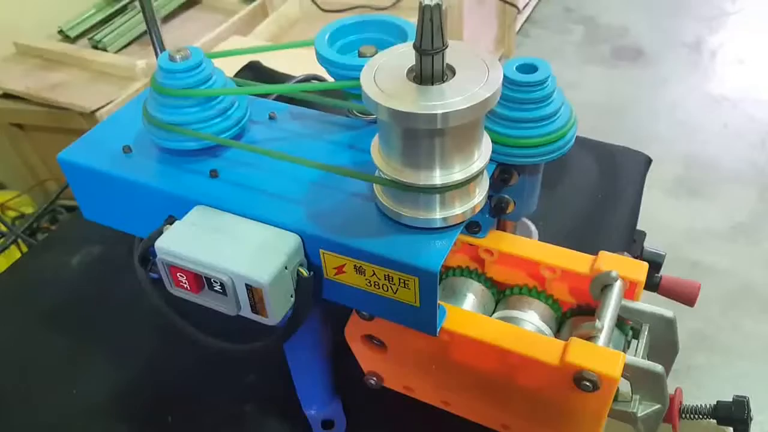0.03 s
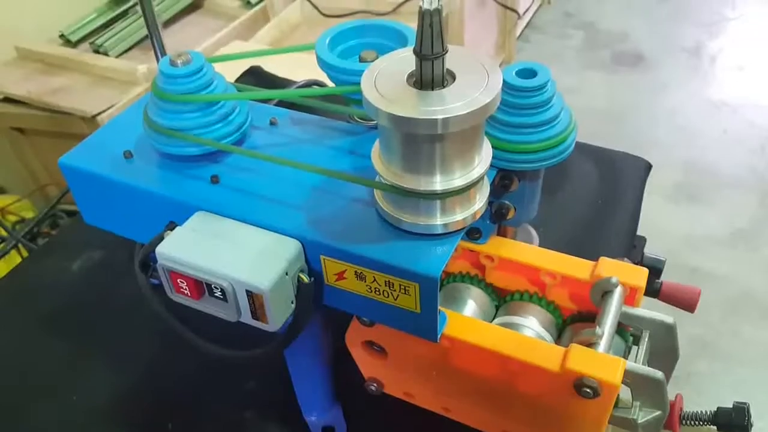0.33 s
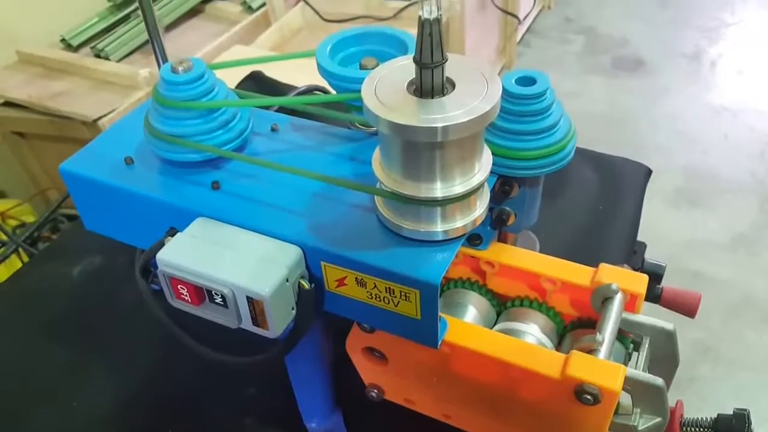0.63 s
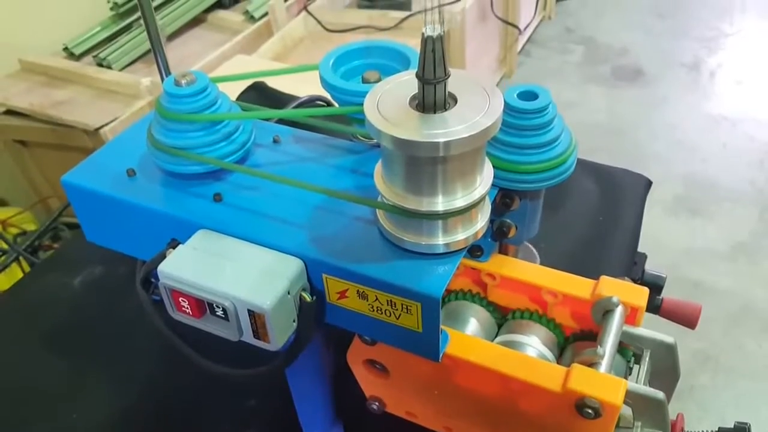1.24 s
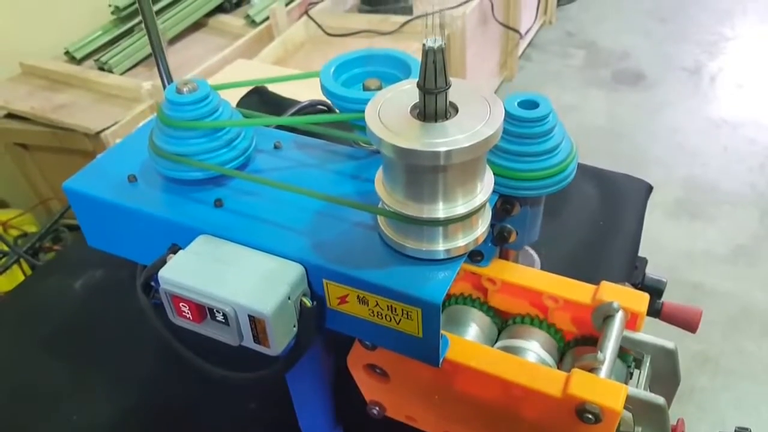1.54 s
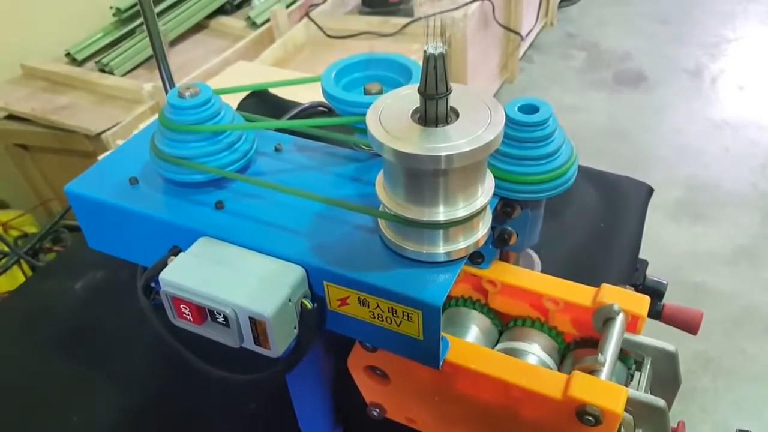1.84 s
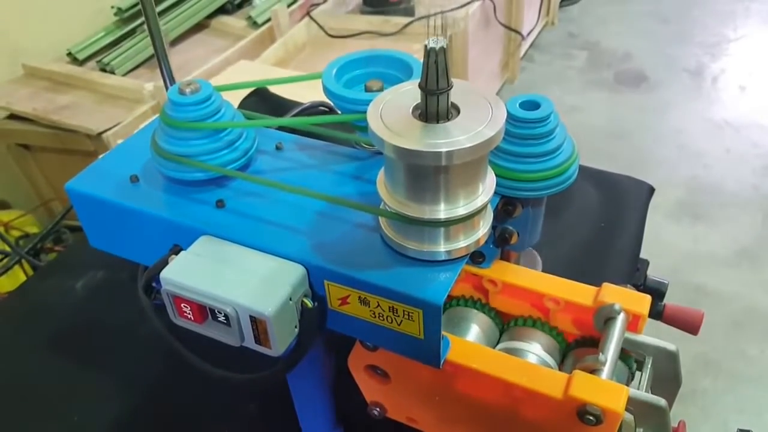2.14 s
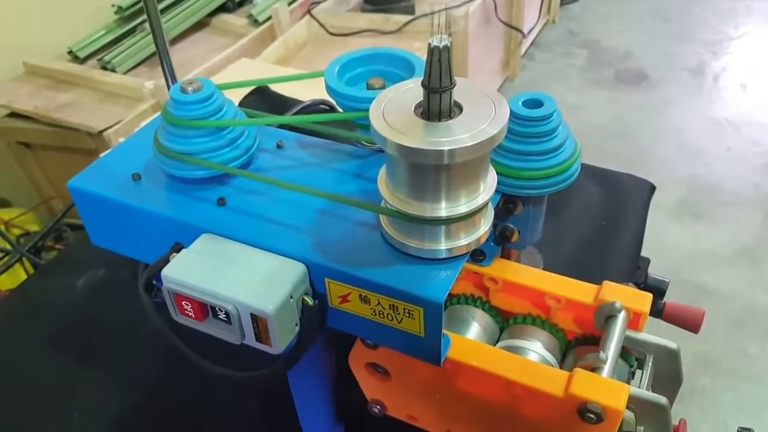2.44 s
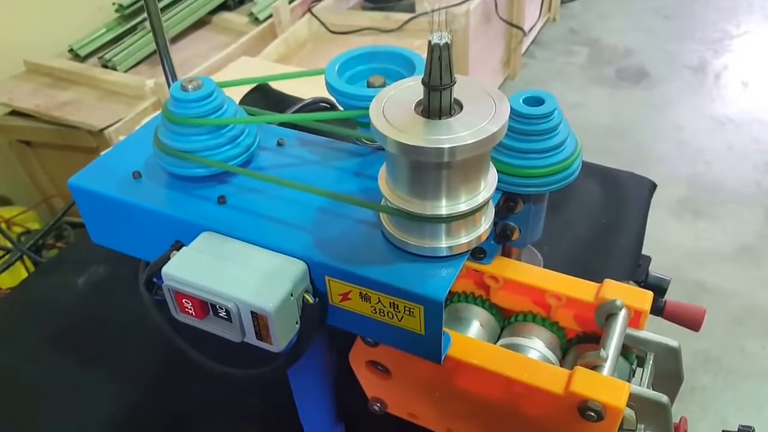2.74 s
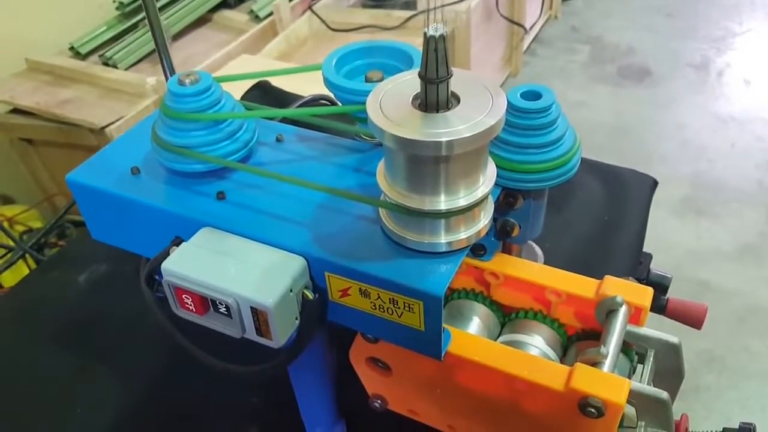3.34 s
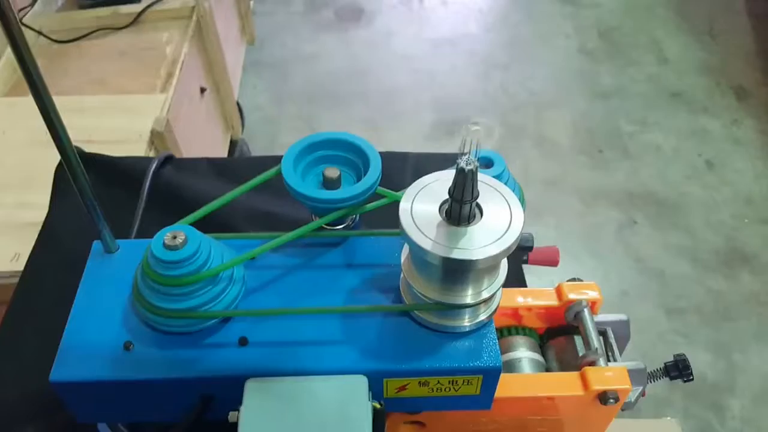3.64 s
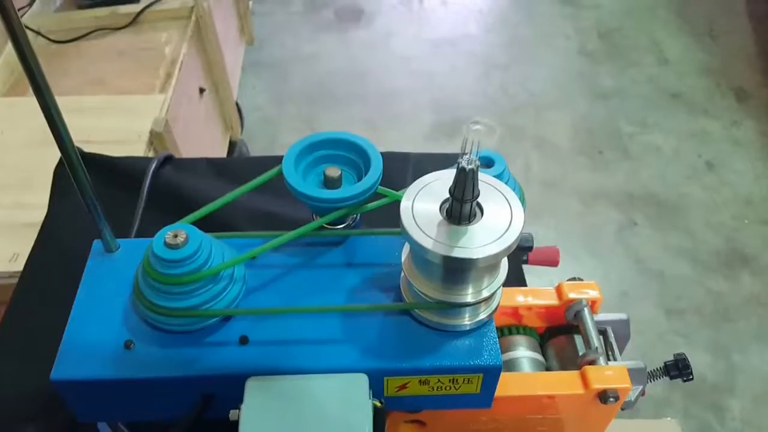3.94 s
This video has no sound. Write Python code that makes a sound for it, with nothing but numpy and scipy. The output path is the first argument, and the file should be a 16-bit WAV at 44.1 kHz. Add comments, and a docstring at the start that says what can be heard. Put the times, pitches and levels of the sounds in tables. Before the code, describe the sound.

After a brief silence, the whirr of a small belt-driven machine fades in from about 0.5 to 1 second and runs steadily, close by in a workshop. The motor hums and gears whine and rattle in a metal case, while belts flap and chafe in a quick rhythm, with occasional light scrapes and soft thumps. At about 3.7 seconds the listening position jumps and different tones stand out.

```python
"""A steady whirr fades in: a small belt-driven bench machine, running close by in a workshop.
The motor hums; its gears whine, rattle in a metal case and, with belt and shaft, shake the frame.
Two round belts flap on every lap, and the faster one also throbs and chafes on a pulley.
Near the end the listening position jumps to another side: a new colour, and other tones stand out."""
import sys
import numpy as np
from scipy import signal
from scipy.fft import rfft, irfft, next_fast_len
from scipy.io import wavfile
from scipy.ndimage import map_coordinates

SR = 44100
rng = np.random.default_rng(int(sys.argv[2]) if len(sys.argv) > 2 else 0)


def digitize_waveform(pressure):
    """Quantize a signal to 16-bit integers and store it at the path in sys.argv[1].

    Rows of a 2-D input are taken as channels; values are limited to [-1, 1].
    """
    field = np.atleast_2d(pressure).T
    bounded = np.clip(field, -1, 1)
    quanta = np.round(bounded * 32767).astype(np.int16)
    wavfile.write(sys.argv[1], SR, quanta)


N = 176400
SHAFT_HZ, MESH_HZ = 23.375, 185.05  # shaft turns and tooth contacts per second
LAP_HZ, SECOND_LAP_HZ = 9.385, 5.93  # laps per second of the two belts


def amp(db):
    """Decibels to gain."""
    return 10 ** (np.asarray(db) / 20)


def unit(x):
    """Scale to rms 1."""
    return x / np.sqrt(np.mean(x ** 2) + 1e-20)


def wobble(per_s):
    """A smooth random curve with per_s knots a second."""
    knots = rng.standard_normal(int(N * per_s / SR) + 4)
    return map_coordinates(knots, [np.arange(N) * per_s / SR])


def colour(x, rows, column=1):
    """Minimum-phase EQ whose gain follows rows of f/Hz, gain/dB on a log axis."""
    size = 2 * next_fast_len(N // 2 + SR // 4)
    rows = np.array(rows)
    db = np.interp(np.log(np.fft.rfftfreq(size, 1 / SR) + 1), np.log(rows[:, 0] + 1), rows[:, column])
    cepstrum = irfft(np.log(amp(db)))
    cepstrum[1:size // 2] *= 2
    cepstrum[size // 2 + 1:] = 0
    return irfft(rfft(x, size) * np.exp(rfft(cepstrum)), size)[..., :N]


def passes(clock, rate_hz, place=0):
    """Times at which a turning part passes a place (0-1) in its cycle."""
    turns = np.arange(int(clock[-1] * rate_hz)) + place
    return np.interp(turns / rate_hz, clock, np.arange(N) / SR)


def surface(clock, rate_hz):
    """A rough surface that comes round again every turn, rms 1."""
    size = int(SR / rate_hz)
    bumps = rng.standard_normal(size)
    return unit(map_coordinates(bumps, [clock * rate_hz % 1 * size], mode="grid-wrap"))


def thump(hz, db, rise_s, t60_s):
    """One low resonance with a soft attack and an exponential decay."""
    t = np.arange(SR // 3) / SR
    return np.sin(2 * np.pi * hz * t) * amp(db - 60 * t / t60_s) * (1 - np.exp(-t / rise_s))


def frame_rumble(clock, roll_db=-5.5, belt_db=-7.5, shaft_db=-9.5, room_db=-15):
    """Rolling gears, belt and shaft shake the frame; the room adds a part that differs at each ear."""
    # resonances of the frame: f/Hz, gain/dB
    frame_ring = [(20,-89), (50,-72.5), (85,-71.5), (115,-61), (135,-74), (160,-66.5), (215,-75.5),
                  (245,-73.5), (285,-59.5), (325,-65), (380,-59), (430,-59.5), (460,-68), (500,-58.5),
                  (600,-53), (645,-53), (680,-57), (740,-52.5), (790,-51.5), (870,-62), (915,-52.5),
                  (960,-64.5), (1050,-57), (1190,-56), (1300,-71.5), (1420,-71.5), (1700,-92.5)]
    force = (amp(roll_db) * rng.standard_normal(N) + amp(belt_db) * surface(clock, LAP_HZ)
             + amp(shaft_db) * surface(clock, SHAFT_HZ))
    room = amp(room_db) * rng.standard_normal((2, N))
    return colour(force + room, frame_ring) * np.sqrt(SR / 2)


def hum(clock, rows):
    """A bed of panned tones, each part steady, part wavering in level and phase."""
    out = np.zeros((2, N))
    for hz, db, waver, pan_db in rows:
        swing = 1 - waver + waver * (wobble(22) + 1j * wobble(22)) / 2
        tone = unit(np.real(swing * np.exp(2j * np.pi * (hz * clock + rng.random()))))
        out += tone * amp([[db - pan_db / 2], [db + pan_db / 2]])
    return out


def belt_throb(clock, hz=374.8, db=-40.5, flutter=0.62):
    """The belt's free span sings, nearly stopping once a lap and swelling twice."""
    # envelope of one lap: place/lap, level/dB
    lap_shape = [(.02, -2), (.12, -19), (.23, -19), (.4, 2), (.61, -5), (.72, 2.5), (.92, 0.5)]
    place, lap_db = np.transpose(lap_shape)
    envelope = amp(np.interp(clock * LAP_HZ % 1, place, lap_db, period=1))
    swing = 1 + flutter * (wobble(40) + 1j * wobble(40))
    return amp(db) * unit(envelope * np.real(swing * np.exp(2j * np.pi * hz * clock)))


def belt_flaps(clock, jitter_s=0.0005, scatter_db=2.4):
    """Each belt's joint runs over the pulleys once a lap and sets the deck or the belt ringing softly."""
    # one flap per belt: lap rate/Hz, place/lap, f/Hz, level/dB, rise/s, t60/s
    flaps = [(LAP_HZ, .5, 292, -30.5, 0.0081, 0.093), (SECOND_LAP_HZ, 0.23, 120, -42, .035, 0.43)]
    out = np.zeros(N + SR)
    for lap_hz, place, hz, db, rise_s, t60_s in flaps:
        ring = thump(hz, db, rise_s, t60_s)
        for at_s in passes(clock, lap_hz, place):
            late, strength = rng.standard_normal(2)
            start = int(abs(at_s + jitter_s * late) * SR)
            out[start:start + len(ring)] += ring * amp(scatter_db * strength)
    return out[:N]


def belt_slaps():
    """Now and then a belt whips harder and thumps the deck."""
    # whips of a belt: t/s, f/Hz, level/dB
    whips = [(1.23, 113, -28), (2.252, 112, -29), (3.19, 156, -39), (3.595, 135, -26)]
    out = np.zeros(N + SR)
    for at_s, hz, db in whips:
        ring = thump(hz, db, rise_s=.02, t60_s=.16)
        out[int(at_s * SR):][:len(ring)] += ring
    return out[:N]


def belt_chafe(clock, chafe_db=-19.5, chafe_width_s=0.0043, scrape_width_s=0.0086, left_db=-7):
    """The joint chafes on a pulley once a lap, to the right; some laps add a longer, brighter scrape."""
    # colour of the chafe: f/Hz, gain/dB
    chafe_eq = [(900, -28), (1500, -0.5), (1900, 2), (2450, 3), (2900, -9), (4400, -13), (9000, -21),
                (15000, -29)]
    # colour of a scrape: f/Hz, gain/dB
    scrape_eq = [(900, -35), (1800, 2), (2900, 4), (3700, -11), (4400, 7.5), (4850, -6.5), (5400, -27),
                 (9000, -20)]
    # harder scrapes: t/s, level/dB
    scrapes = [(.724, -22), (.94, -24), (1.166, -21), (1.265, -24), (1.793, -19), (1.897, -20),
               (2.643, -22), (2.75, -25)]
    t = np.arange(N) / SR

    def rub(events, width_s, eq):
        """Coloured noise in bell-shaped bursts."""
        envelope = sum(amp(db) * np.exp(-.5 * ((t - at_s) / width_s) ** 2) for at_s, db in events)
        return envelope * unit(colour(rng.standard_normal((2, N)), eq))

    laps = [(at_s, chafe_db) for at_s in passes(clock, LAP_HZ, place=0.817)]
    friction = rub(laps, chafe_width_s, chafe_eq) + rub(scrapes, scrape_width_s, scrape_eq)
    return friction * amp([[left_db], [0]])


def gear_whine(clock, waver=0.086):
    """Gear tones locked to the motor shaft."""
    # pitches of the whine: multiple of the shaft speed
    orders = [27, 28, 30, 35, 39, 63]
    # strength of each order: level/dB
    levels = [-45.5, -39, -39, -35.5, -48, -41.5]
    out = np.zeros(N)
    for order, db in zip(orders, levels):
        envelope = amp(db) * np.sqrt(2) * (1 + waver * wobble(8))
        out += envelope * np.sin(2 * np.pi * (order * SHAFT_HZ * clock + rng.random()))
    return out


def gear_drone(clock, hz=735.5, db=-34, flutter=0.41, swell_hz=1.85, swell_db=3, crest_s=1.59):
    """The strongest tone of the gearing, slowly swelling and sinking."""
    swell = amp(swell_db * np.cos(2 * np.pi * swell_hz * (clock - crest_s)))
    swing = 1 + flutter * (wobble(16) + 1j * wobble(16))
    return amp(db) * unit(swell * np.real(swing * np.exp(2j * np.pi * hz * clock)))


def gear_rattle(clock, drive_db=-1.01, slide_share=0.7, left_lag_s=.00015):
    """Each tooth scrapes briefly as it meshes, over even sliding and fast chatter; the case rings."""
    # direct part of the gear noise: f/Hz, gain/dB
    direct_eq = [(1200, -3.5), (2400, -2.5), (4000, -4.5), (15000, -6.5)]
    # part scattered by case and room: f/Hz, gain/dB
    diffuse_eq = [(1200, -0.5), (2400, -4.5), (4000, -2), (15000, -2)]
    # resonances of the metal case: f/Hz, left gain/dB, right gain/dB
    case_ring = [(676, -90.5, -89.5), (1205, -71.5, -61.5), (1454, -65, -59.5), (1550, -57, -49),
                 (1730, -53, -47), (1775, -65, -48.5), (1860, -71.5, -46.5), (1965, -65, -46.5),
                 (1980, -69, -52.5), (2103, -69, -48), (2264, -62, -42.5), (2324, -57, -36.0),
                 (2420, -64, -38.5), (2531, -61, -38), (2618, -65.5, -44), (2750, -62.0, -49.5),
                 (2883, -67, -54), (2990, -63.5, -66), (3110, -59.5, -63), (3280, -49, -55.5),
                 (3247, -61, -59), (3480, -56.5, -55.5), (3530, -58, -61), (3780, -65, -60.5),
                 (3860, -58.5, -52.5), (3980, -73, -58), (4320, -67, -55.0), (4770, -81, -57.5),
                 (4890, -60.5, -61), (5240, -69.5, -69.5), (5500, -58, -67.5), (5820, -64, -71.5),
                 (6120, -62, -69), (7400, -65.0, -68.5), (8800, -67, -68), (9340, -70.5, -70.5),
                 (9700, -64, -71), (9950, -68.5, -70), (11070, -66.5, -65.5), (12030, -66.5, -60),
                 (13000, -62.5, -67), (13700, -71.5, -71.5), (15600, -70, -63.5)]
    jitter_s, scatter_db, tooth_fade_s = 0.00063, 2.5, 0.0045
    chatter_db = wobble(600) + 0.81 * wobble(60) - 0.45 * np.sin(2 * np.pi * SHAFT_HZ * clock)
    direct_noise, diffuse_noise = rng.standard_normal(N), rng.standard_normal((2, N))
    mesh_s = passes(clock, MESH_HZ)
    late, strength = rng.standard_normal((len(mesh_s), 2)).T
    starts = ((mesh_s + jitter_s * late) * SR).astype(int) % N
    hits = np.bincount(starts, amp(scatter_db * strength) ** 2, N)
    tooth_power = signal.lfilter([1], [1, -np.exp(-1 / (tooth_fade_s * SR))], hits)
    power = slide_share + (1 - slide_share) * tooth_power / tooth_power.mean()
    force = amp(drive_db) * unit(amp(chatter_db) * np.sqrt(power))
    right = colour(force * direct_noise, direct_eq)
    left = map_coordinates(right, [np.arange(N) - left_lag_s * SR])
    ears = np.array([left, right]) + colour(force * diffuse_noise, diffuse_eq)
    return np.array([colour(ears[ear], case_ring, ear + 1) for ear in range(2)]) * np.sqrt(SR / 2)


def scene(wander=0.001207, jump_s=3.682):
    """One slightly unsteady motor paces the machine; at jump_s a hard cut to the second position."""
    # tones of belts, motor and case: f/Hz, level/dB, waver (0-1), right over left/dB
    machine_tones = [(35, -67, .3, 0), (82, -66, 0.8, -2), (107, -55, 0.8, 1), (112.6, -52.5, 0.83, 2),
                     (125.7, -64, 1, 3), (151.5, -57.5, 1, 1), (202, -61, 0.5, 4), (596, -44, 0.43, 7.5),
                     (778, -42, .8, 14.5), (1133, -44.5, 0.73, -4), (1189, -40.5, 0.95, 5),
                     (1475, -49, 0.77, 8), (1940, -46, 0.9, 4), (2325, -33.5, 0.86, 18),
                     (3153, -48, 0.95, -7)]
    # tones added at the second position: f/Hz, level/dB, waver (0-1), right over left/dB
    second_tones = [(656.8, -42, .4, 0), (913, -41, 0.27, 0), (1696, -42, 0.1, 0), (2331, -30, .4, 7)]
    # colour of the second position: f/Hz, left gain/dB, right gain/dB
    second_eq = [(60,1,1.5), (150,2.5,1.5), (300,-0.5,1), (380,6.5,8.5), (506,3,2.5), (650,-2.5,1),
                 (770,-3.5,-2.5), (940,4.5,-1), (1140,-13,-0.5), (1380,2,1), (1820,-6,-4.5), (2100,5,2.5),
                 (2290,9.5,0.5), (2580,9,-5.5), (2790,8,0), (3050,-5,14), (3550,-1,2.5), (3800,5,4),
                 (4300,5,6), (4620,7,-0.5), (5190,1,15.5), (5900,5.5,16), (6060,5.5,-4), (7060,-3,-2),
                 (9500,3,3), (12000,-5.5,-0.5), (15000,6,-1)]
    clock = np.cumsum(1 + wander * wobble(3)) / SR  # the motor's own time in seconds
    machine = (gear_whine(clock) + gear_drone(clock) + hum(clock, machine_tones)
               + belt_flaps(clock) + belt_throb(clock) + belt_slaps()
               + frame_rumble(clock) + gear_rattle(clock) + belt_chafe(clock))
    other_side = np.array([colour(machine[ear], second_eq, ear + 1) for ear in range(2)])
    other_side += hum(clock, second_tones)
    return np.where(np.arange(N) / SR < jump_s, machine, other_side)


def record(dry, ceiling=.97, knee=10, top_hz=15950):
    """Fade-in from silence, soft peak limiter and a steep low-pass."""
    # fader ride: t/s, level/dB
    fade = [(.435, -84), (.446, -41.5), (.49, -24), (.55, -16.5), (.63, -7.5), (.75, -2), (.9, -0.5),
            (1.05, .5), (2, 0), (4, 0.5)]
    fade_s, fade_db = np.transpose(fade)
    t = np.arange(N) / SR
    faded = dry * amp(np.interp(t, fade_s, fade_db)) * (t > fade_s[0])
    limited = faded / (1 + np.abs(faded / ceiling) ** knee) ** (1 / knee)
    lowpass = signal.firwin(401, top_hz, window="blackmanharris", fs=SR)
    return signal.fftconvolve(limited, lowpass[None], mode="same", axes=1)


dry = scene()
out = record(dry)
digitize_waveform(out)
```